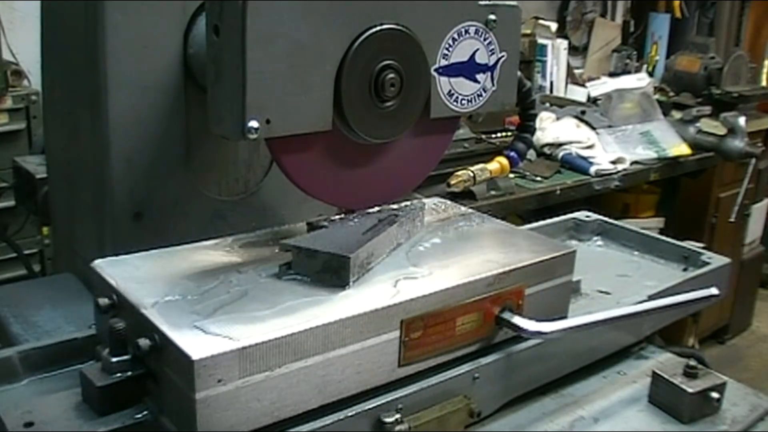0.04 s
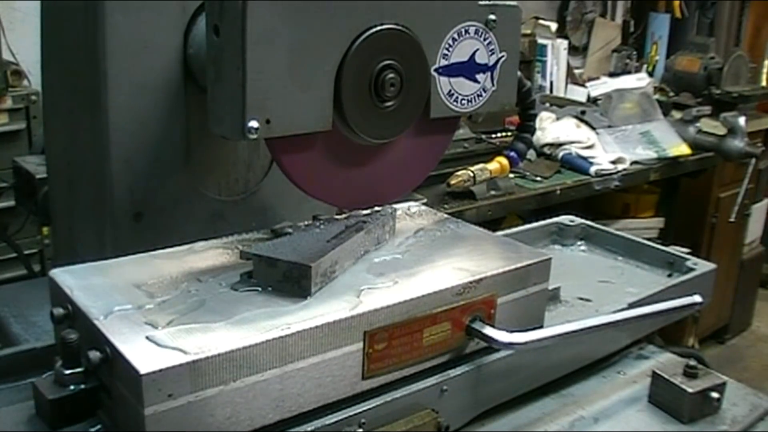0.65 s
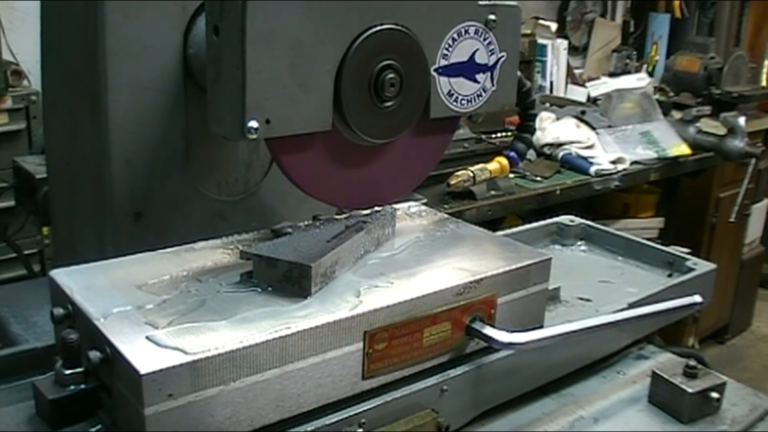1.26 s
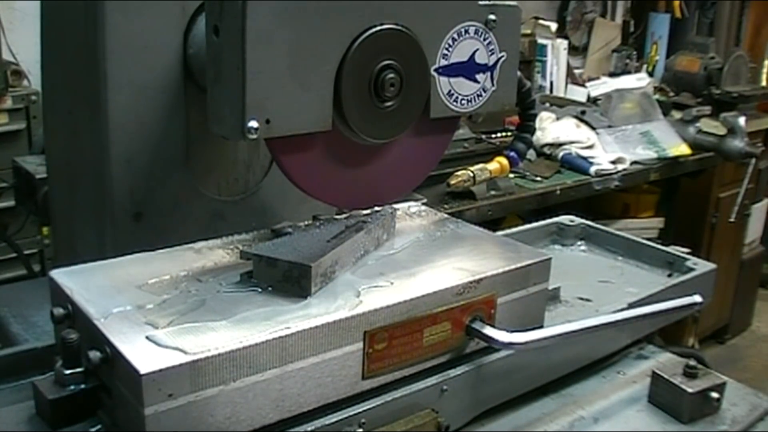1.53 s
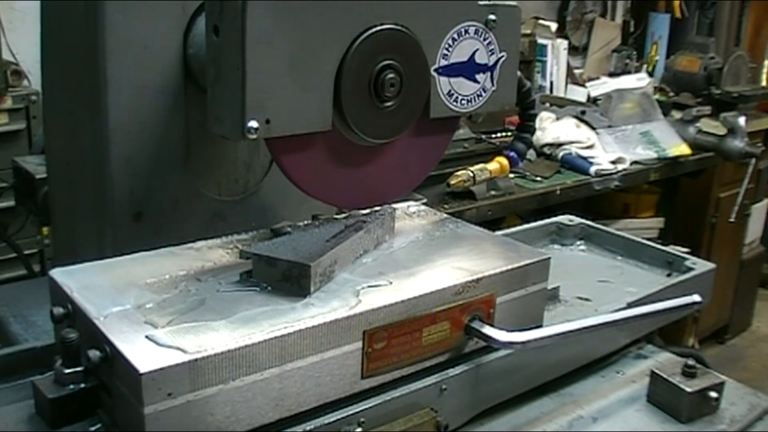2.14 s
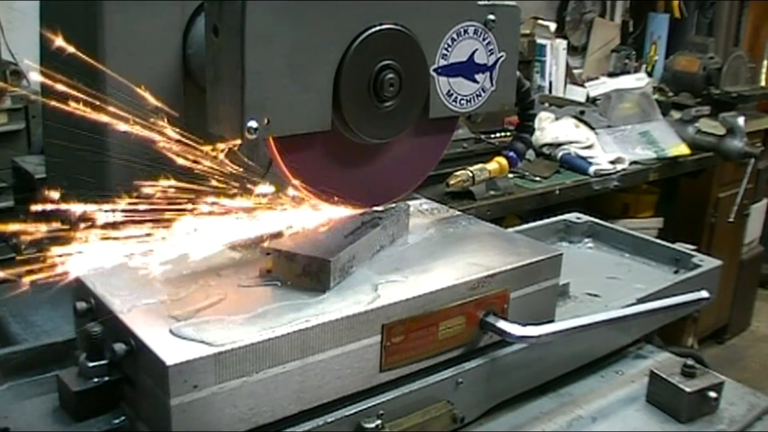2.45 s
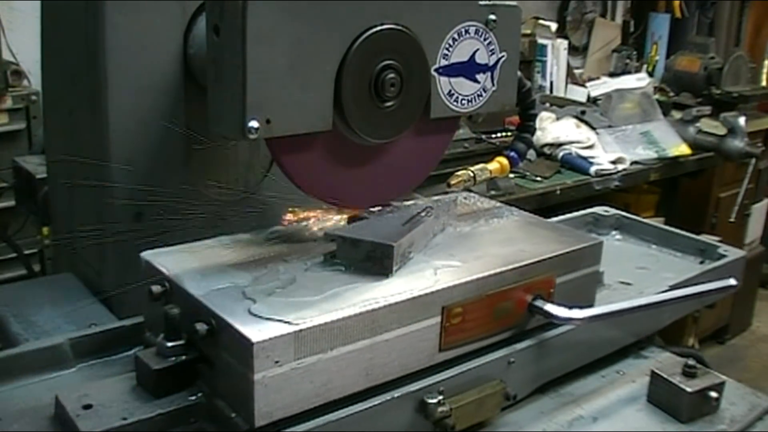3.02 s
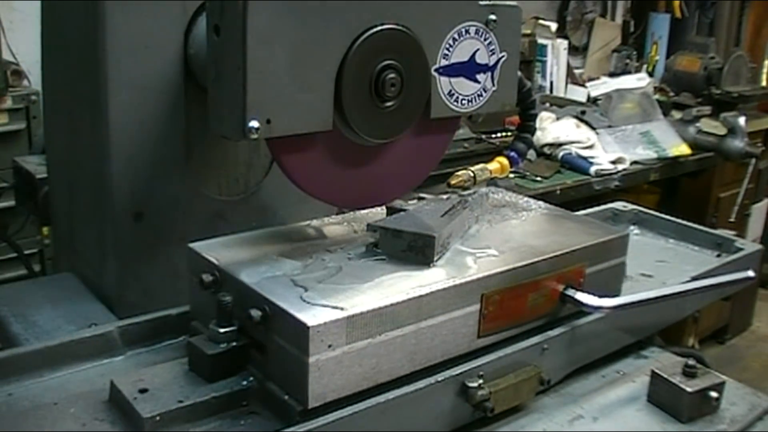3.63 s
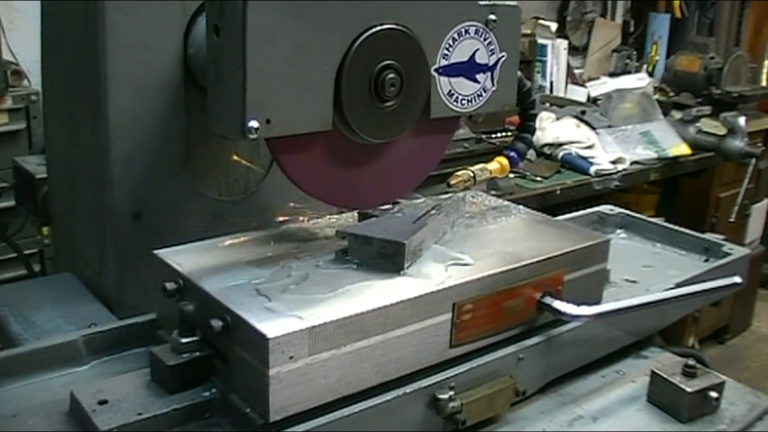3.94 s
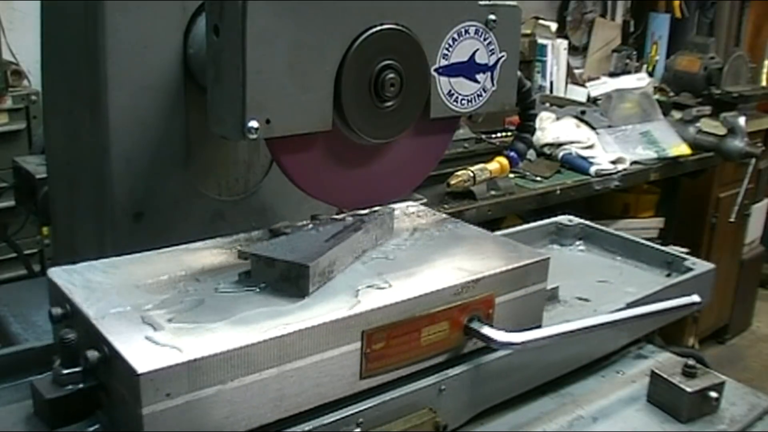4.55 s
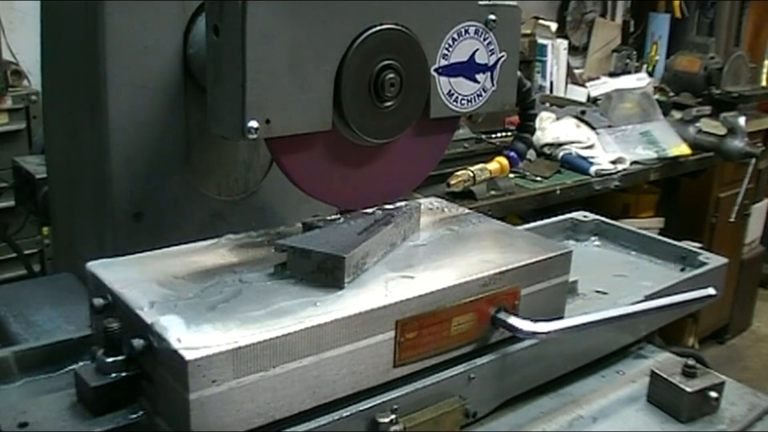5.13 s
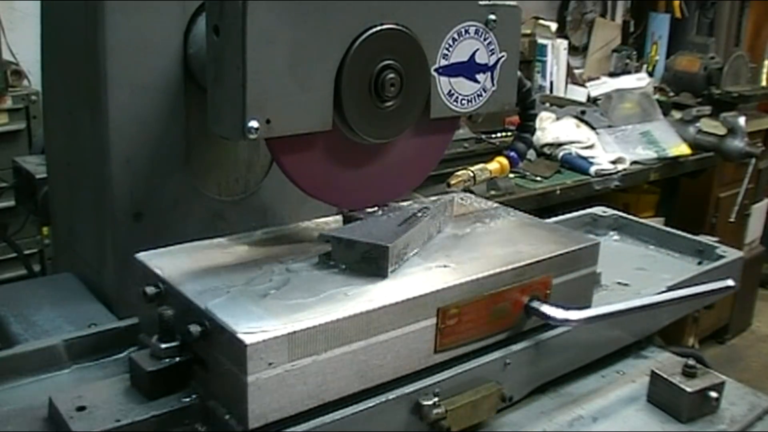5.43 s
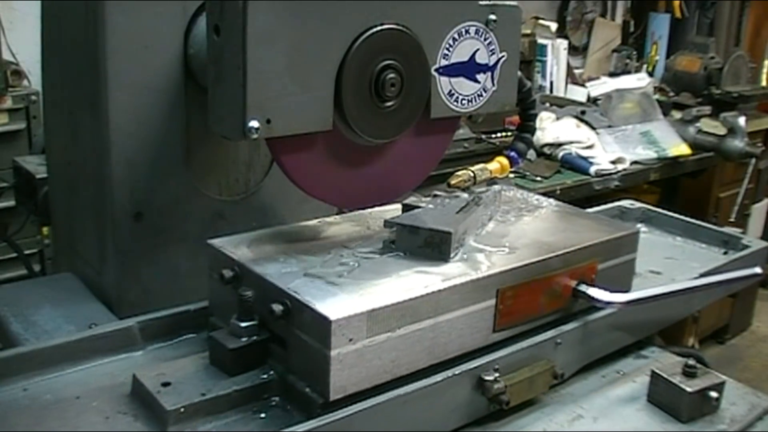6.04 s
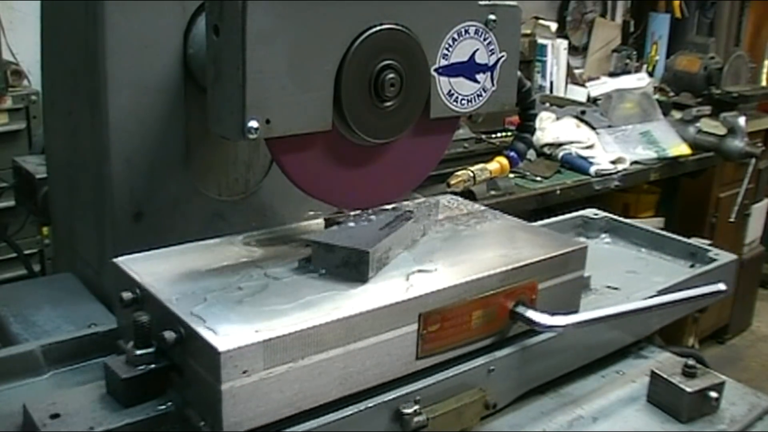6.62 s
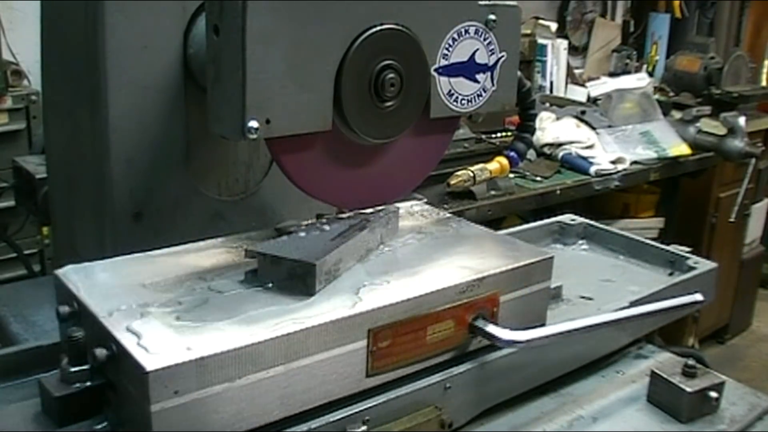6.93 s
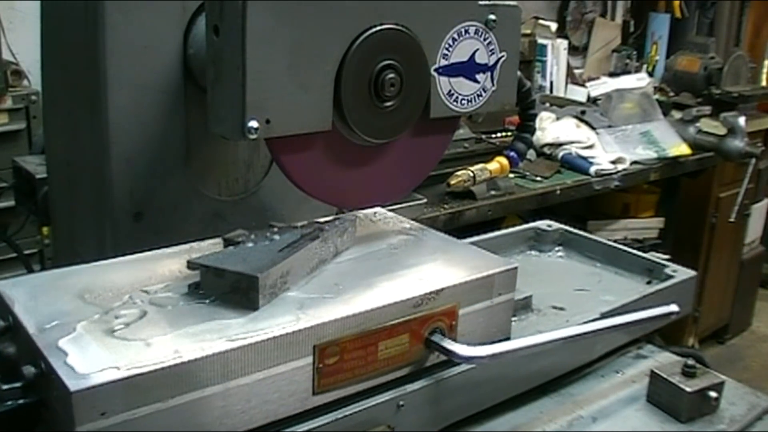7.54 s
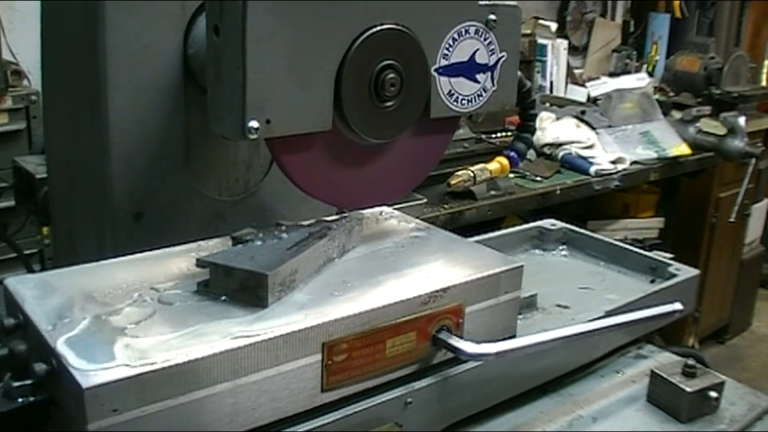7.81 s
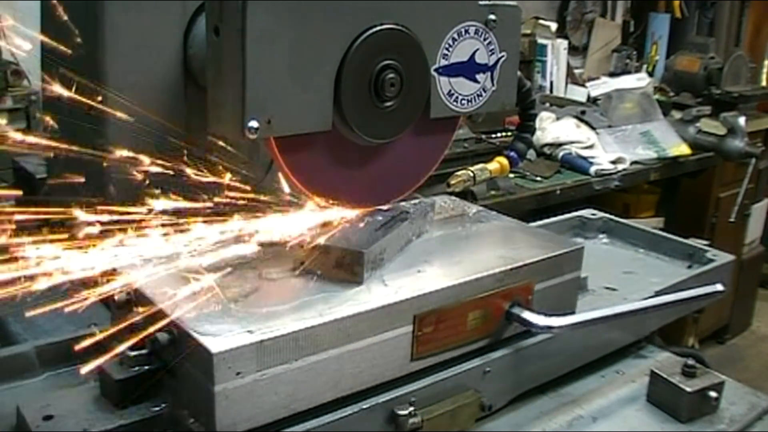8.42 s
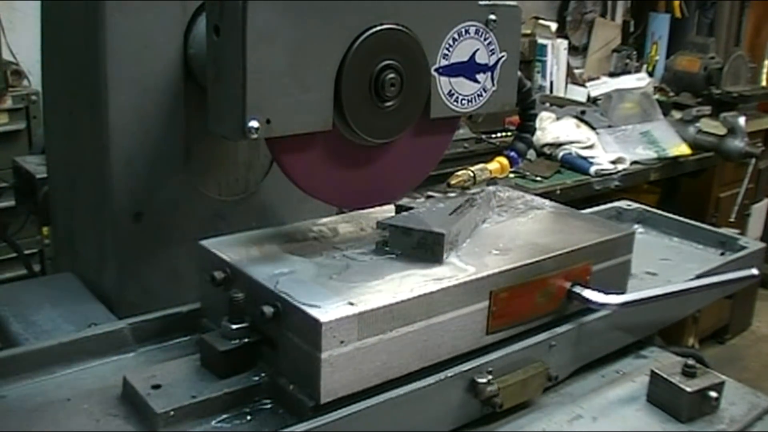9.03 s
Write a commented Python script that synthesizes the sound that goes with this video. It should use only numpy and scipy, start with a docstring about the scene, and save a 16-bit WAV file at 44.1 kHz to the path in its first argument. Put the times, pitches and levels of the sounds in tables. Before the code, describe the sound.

A surface grinder runs in a small workshop, its spindle and motor making a low, rapidly throbbing drone. Over it a jet of air and coolant hisses brightly on steel the whole time. The hiss sputters and surges slightly, shifting between a flat splash and a hollower blowing as the table moves back and forth. A few times the whole sound dips briefly. The stereo microphone is close to the machine.

```python
"""Surface grinder with coolant mist

A small workshop, a stereo microphone close to the machine. The spindle hums and throbs once a turn.
A jet of air and coolant hisses at the steel chuck, which mirrors the hiss into a comb of peaks. As the
table travels, the jet splashes on the flat chuck or blows hollowly across the edge of the bar.
The hiss surges now and then, the drone swells slowly, and a few times the whole sound dips."""
import sys
import numpy as np
from scipy import signal
from scipy.fft import rfft, irfft, next_fast_len
from scipy.io import wavfile
from scipy.ndimage import map_coordinates

SR = 44100
rng = np.random.default_rng(int(sys.argv[2]) if len(sys.argv) > 2 else 0)


def inscribe(sig):
    """Save sig as 16-bit PCM at rate SR to the path in sys.argv[1].

    A 1-D sig is mono; a 2-D sig holds one channel per row.
    Samples are clipped to [-1, 1] before scaling.
    """
    pcm = np.round(np.clip(np.atleast_2d(sig).T, -1, 1) * 32767)
    wavfile.write(sys.argv[1], SR, pcm.astype(np.int16))


N = 408807

# How alike the drone is at the two capsules. Each row: frequency in Hz, likeness from 0 to 1.
LIKENESS = [(100, 0.98), (300, 0.94), (600, 0.64), (1000, 0.13), (2000, 0.091), (5000, 0.1)]
BAR_ONSET, JET_WANDER = 0.054, 0.04  # both as shares of the table's full travel


def amp(db):
    """Decibels to gain."""
    return 10 ** (np.asarray(db) / 20)


def unit(x):
    """Scale to rms 1."""
    return x / np.sqrt(np.mean(x ** 2) + 1e-20)


def along(points, hz):
    """Read (Hz, value) points on a log frequency axis."""
    point_hz, values = np.transpose(points)
    return np.interp(np.log(hz + 1), np.log(point_hz + 1), values)


def bell(x, centre, width):
    """A smooth hump of height 1; width is its half width at 1/e."""
    return np.exp(-((x - centre) / width) ** 2)


def wobble(rate):
    """A smooth random curve, rate knots a second."""
    return map_coordinates(rng.standard_normal(int(N * rate / SR) + 4), [np.arange(N) * rate / SR])


def filtered(x, response):
    """Filter x by a complex response, given as a function of Hz."""
    size = next_fast_len(N + SR // 2)
    return irfft(rfft(x, size) * response(np.fft.rfftfreq(size, 1 / SR)), size)[..., :N]


def rush(colour, channels=3):
    """Unrelated noises of rms 1, coloured by (Hz, dB) points."""
    size = next_fast_len(N)
    hz = np.fft.rfftfreq(size, 1 / SR)
    real, imaginary = rng.standard_normal((2, channels, len(hz)))
    return unit(irfft((real + 1j * imaginary) * amp(along(colour, hz)), size)[:, :N])


def travel():
    """The table's position at every sample, cranked to and fro by hand."""
    # Each row: time in seconds, position from 0 (far left) to 1 (far right).
    path = [(0, 0.51), (.2, 0.56), (.45, .31), (1.1, 0.31), (2.3, 0.29), (2.5, 0.56), (3.05, 0.7),
            (3.55, .92), (3.8, 0.85), (4.1, 0.6), (4.4, 0.48), (4.72, 0.16), (5, 0.37), (5.25, 0.62),
            (5.5, 0.83), (5.75, 0.87), (6, 0.92), (6.25, 0.88), (6.5, 0.61), (7, 0.4), (7.25, 0.1),
            (7.6, 0.036), (7.85, 0.13), (7.97, 0.32), (8.12, .35), (8.25, 0.56), (8.6, 0.71), (8.9, 0.87),
            (9.27, .92)]
    return np.interp(np.arange(N) / SR, *np.transpose(path))


def aim(chuck_at=0.306, left_db_per_travel=24, right_db_per_travel=14.5):
    """How squarely the jet meets the flat chuck: in dB below the best aim, and as a share of the power."""
    offset = travel() - chuck_at
    miss_db = np.maximum(-left_db_per_travel * offset, right_db_per_travel * offset)
    return miss_db, amp(-miss_db) ** 2


def spindle(turn_hz=20.588, skew_rad=1.24, slip_turns=0.00041):
    """The shaft's unbalance knocks every turn; the castings smear it into a throbbing stack of lines."""
    # Each row: multiple of the turn rate (rounded in use), relative mid level in dB, side level in dB.
    strong_lines = [(3, -61, -77), (5, -57, -66), (8, -51, -72), (12, -47, -70), (14, -49.5, -73),
                    (15, -54, -53), (16, -50.5, -51), (17, -46, -64), (18, -45.5, -69), (19, -43.5, -45.5),
                    (20, -37, -54), (21, -52, -64), (22, -66.5, -63), (24, -44, -54), (25, -42.5, -60),
                    (26, -47.5, -48), (27, -47.5, -54), (28, -47.5, -58), (31, -46.5, -62),
                    (32, -43.5, -61), (39, -46.5, -61), (40, -42, -41), (41, -61, -57), (42, -37, -49),
                    (43, -42.5, -53), (44, -48, -53), (46, -50.5, -58), (48, -46, -40), (50, -59, -45),
                    (56, -49.5, -45), (58, -42, -43.5), (59, -42.5, -55), (60, -47, -42), (61, -58.5, -51),
                    (62, -48, -45), (61.4, -51.5, -53), (64, -53.5, -57)]
    # The lines between them. Each row: frequency in Hz, relative level per line in dB.
    weak_lines = [(20, -100), (80, -82), (180, -57), (680, -53), (760, -59), (950, -49.5), (1100, -55.5),
                  (1350, -62), (1480, -70), (1900, -60), (2100, -84)]
    # When each register of the castings answers the knock. Each row: frequency in Hz, lag in turns.
    answer_lag = [(200, .4), (340, .2), (410, .3), (450, .2), (520, .28), (700, .3), (900, .2), (1080, .4),
                  (1130, .9)]
    # How far they smear it. Each row: frequency in Hz, phase scatter in radians.
    smear = [(150, 1.8), (330, 1.3), (430, .8), (520, 1.1), (660, 1.5), (800, 2.1), (1050, 2.2), (1180, .7)]
    size = 4096  # samples in one turn
    orders = np.arange(size // 2 + 1)
    hz = orders * turn_hz
    mid = amp(along(weak_lines, hz)) * (hz < weak_lines[-1][0]) * (orders > 0)
    side = mid * amp(-3) * np.sqrt(1 - along(LIKENESS, hz) ** 2)
    for order, mid_db, side_db in strong_lines:
        mid[round(order)], side[round(order)] = amp(mid_db), amp(side_db)
    lag_cycles = np.cumsum(along(answer_lag, hz))
    scatter_rad = along(smear, hz) * rng.standard_normal(len(orders))
    phase = np.exp(1j * (scatter_rad - 2 * np.pi * lag_cycles))
    # standing waves bring each line to the capsules out of step, louder on the left
    skew = np.exp(1j * (-1) ** orders * skew_rad)
    one_turn = irfft(phase * np.array([mid + side * skew, mid - side * skew]))
    turns = np.arange(N) / SR * turn_hz + slip_turns * wobble(12)
    throb = np.array([np.interp(turns, np.arange(size) / size, wave, period=1) for wave in one_turn])
    shake_db = .5 * wobble(28)
    return unit(throb * amp(shake_db))


def whining(throb, above_hz=750):
    """Twice the spindle's upper lines swell into a whine."""
    # Each row: peak time in seconds, half length in seconds, rise in dB.
    whines = [(.78, .27, 1.3), (4.92, .2, 1.6)]
    t = np.arange(N) / SR
    rise_db = sum(db * bell(t, at, length) for at, length, db in whines)
    return throb + (amp(rise_db) - 1) * filtered(throb, lambda hz: hz > above_hz)


def frame():
    """Bearings and the wheel's wind rumble through the machine's castings."""
    # Each row: frequency in Hz, relative noise density in dB.
    rumble_colour = [(20, -33), (55, -28), (85, -7.5), (115, 3.5), (140, -5), (200, 2.5), (400, 0.2),
                     (505, 3.5), (580, -3), (780, -0.5), (862, 4), (930, -1), (1130, 0.2), (1200, 2.5),
                     (1280, 2), (1400, -0.5), (2600, -7), (6000, -20.5)]
    spread = lambda hz: np.arccos(along(LIKENESS, hz)) / 2
    rumble = rush(rumble_colour, channels=2)
    mid, side = filtered(rumble, lambda hz: np.array([np.cos(spread(hz)), np.sin(spread(hz))]))
    return unit(np.array([mid + side, mid - side]))


def motor(hum_hz=118):
    """The motor's wavering electric hum."""
    waver_db = 1.8 * wobble(14)
    return unit(np.sin(2 * np.pi * hum_hz * np.arange(N) / SR) * amp(waver_db))


def drone(reflected_db=0.82, growth_db_per_s=0.04):
    """Spindle, frame and motor swell together, a little louder when the chuck reflects them."""
    # Each row: peak time in seconds, half length in seconds, rise in dB.
    swells = [(.74, 0.54, 1.7), (1.464, 0.24, 1.4), (2.2, 0.16, 2), (3.02, 0.23, 1.5), (4.92, 0.15, 1),
              (8.145, 0.058, 1)]
    t = np.arange(N) / SR
    _, on_chuck = aim()
    swell_db = sum(db * bell(t, at, length) for at, length, db in swells) + .25 * wobble(8.6)
    level_db = -29.5 + reflected_db * on_chuck + growth_db_per_s * (t - t.mean()) + swell_db
    lean_left = amp([[.6], [-.6]])
    body = whining(spindle()) + amp(-4) * frame() * lean_left + amp(-24.5) * motor()
    return amp(level_db) * body


def jet(bar_at=0.72, bar_shadow_db=5, edge_at=0.9, spray_caught_db=5, spray_fade_db_per_s=0.02):
    """Air and droplets hiss and sputter on whatever lies under the nozzle: three unrelated copies."""
    # The jet's five noises. Each row: frequency in Hz, relative noise density in dB.
    nozzle_colour = [(1500, -31), (3300, -15.5), (4500, -11.5), (6000, -11), (7500, -7.5), (8500, -3),
                     (9700, 2.5), (10900, 3.5), (12000, -10), (13300, -4), (15300, -17)]
    spray_colour = [(8000, -33.5), (10500, -9), (11700, 4.5), (12600, 5), (13300, -1.5), (13800, 0),
                    (14300, -4), (15000, -6), (15350, -18)]
    splash_colour = [(1800, -31), (2750, -16.5), (3250, -4), (3900, -9), (4450, -7.5), (4900, -9.5),
                     (5400, -3), (5950, -3.5), (6600, -1), (7600, 1), (8700, 4.5), (9800, 4), (11000, -24),
                     (15300, -28)]
    edge_colour = [(1000, -15), (1700, -4), (2450, 4), (2900, 1.5), (3500, 6), (4400, -6), (5300, -3),
                   (7000, -33)]
    whistle_colour = [(3600, -36), (4200, -16), (5400, -18), (6000, -36), (11800, -22), (12500, 1),
                      (12800, 5), (13200, -7), (13800, -5), (14200, -25)]
    # Surges of the hiss and rasps of the edge noise. Each row: peak time in seconds, rise in dB.
    surges = [(.7, 1), (2.66, 1.5), (3.18, 1.7), (3.51, 0.8), (3.83, 2), (4.18, 2), (5.08, 1.5),
              (5.52, 0.5), (5.69, 1.5), (6.64, 2), (7.14, 1.5), (7.46, 1.5), (7.79, 0.5), (8.21, 1.7),
              (8.9, 1.5)]
    rasps = [(.51, 6.5), (3.53, 2), (5.72, 1.5), (6.15, 0.5), (8.91, 3.3)]
    t = np.arange(N) / SR
    position = travel()
    miss_db, on_chuck = aim()
    sputter_db = 0.35 * wobble(35)
    flow_db = sputter_db + 0.27 * wobble(11) + sum(db * bell(t, at, 0.054) for at, db in surges)
    nozzle = amp(-24 + flow_db) * rush(nozzle_colour)
    # the chuck catches the fine spray
    spray_loss_db = spray_caught_db * on_chuck + spray_fade_db_per_s * (t - t.mean())
    spray = amp(-23.5 + flow_db - spray_loss_db) * rush(spray_colour)
    # a broad splash on the flat chuck, blocked in part when the bar cuts in
    on_bar = .5 + .5 * np.tanh((position - bar_at) / BAR_ONSET)
    splatter_db = sputter_db + 0.65 * wobble(18)
    splash = amp(-24.5 - miss_db - bar_shadow_db * on_bar + splatter_db) * rush(splash_colour)
    # a hollow blowing that grows as the bar's edge comes near
    near_db = 3 * (position - .5) + 6 * bell(position, edge_at, 0.067)
    rasp_db = sum(db * bell(t, at, 0.077) for at, db in rasps)
    edge = amp(-43 + near_db + rasp_db) * rush(edge_colour)
    # an airy whistle at the far left of the travel
    whistle = amp(-26.5 + flow_db) * bell(position, 0, 0.16) * rush(whistle_colour)
    return nozzle + spray + splash + edge + whistle


def near_echoes(direct, patterns=7, first_echo_s=0.0014, t60_s=0.045):
    """Short echoes off the machine's near faces; their resonances shift as the table travels."""
    t = np.arange(SR // 25) / SR
    tails = rng.standard_normal((patterns, 2, len(t))) * amp(-60 * t / t60_s) * (t > first_echo_s)
    tails /= np.linalg.norm(tails, axis=2, keepdims=True)
    steady = np.pad(direct, (len(t), 0), mode="reflect")  # the room is already full of sound
    echoes = signal.oaconvolve(steady[None, None], tails, axes=2)[..., len(t):len(t) + N]
    # one pattern for each stretch of the travel; the wandering jet blurs the place
    place = np.clip(travel() + JET_WANDER * wobble(6), 0, 1) * (patterns - 1)
    shares = np.clip(1 - abs(place - np.arange(patterns)[:, None]), 0, 1)
    return np.einsum("kn,kcn->cn", np.sqrt(shares), echoes)


def workshop(direct, far_pair):
    """The machine scatters the hiss from close by; the room returns an unrelated copy to each capsule."""
    # Each row: frequency in Hz, the near faces' share of the scattered power from 0 to 1.
    near_share = [(2000, 0.45), (3300, .7), (5500, 0.95), (8000, .5), (12000, .6)]
    # Each row: frequency in Hz, scattered level in dB against the direct hiss.
    scatter_level = [(2000, 1.5), (3300, -5), (4500, -3), (5800, -6), (7000, -3.5), (9000, -5), (10800, -4),
                     (12000, -2), (14600, 0)]
    near = filtered(near_echoes(direct), lambda hz: np.sqrt(along(near_share, hz)))
    far = filtered(far_pair, lambda hz: np.sqrt(1 - along(near_share, hz)))
    return filtered(near + far, lambda hz: amp(along(scatter_level, hz)))


def chuck_bounce(direct, stretch_per_travel=0.023):
    """The echo off the chuck: with the direct hiss, a comb whose peaks sink as the table moves right."""
    # Each row: frequency in Hz, left and right peak spacing in Hz with the table at far left.
    comb = [(3300, 1110, 1064), (6500, 1085, 1100), (8700, 1099, 1072), (10800, 1088, 1050),
            (12800, 1080, 1076), (15000, 970, 1200)]
    # Each row: frequency in Hz, left and right echo level in dB against the direct hiss.
    strength = [(1800, -32, -32), (2700, -12, -13), (3700, -18, -20), (4870, -8, -12), (5670, -19, -11),
                (6600, -11, -18), (8000, -6, -7.5), (10000, -6, -13), (12200, -4, -14), (15000, -5, -14)]
    comb_hz, *spacings_hz = np.transpose(comb)
    band_hz, *levels_db = np.transpose(strength)
    drift_samples = SR / np.mean(spacings_hz) * stretch_per_travel * (travel() + JET_WANDER * wobble(10))
    bounce = map_coordinates(direct, [np.arange(N) - drift_samples], order=3)
    delay_s = lambda hz: 1 / np.array([np.interp(hz, comb_hz, spacing) for spacing in spacings_hz])
    gain = lambda hz: amp([np.interp(hz, band_hz, db) for db in levels_db])
    return filtered(bounce, lambda hz: gain(hz) * np.exp(-2j * np.pi * hz * delay_s(hz)))


def bar_notches(hiss):
    """As the bar slides under the jet, its echo cancels narrow bands of the hiss."""
    # Each row: centre in Hz, half width in Hz, full depth in dB, table position where it sets in.
    notches = [(4200, 100, 8, 0.83), (4720, 100, 9, 0.46), (5550, 140, 11, 0.7)]
    centre_hz, width_hz, depth_db, start = np.transpose(notches)[:, :, None, None]
    engaged = .5 + .5 * np.tanh((travel() - start) / BAR_ONSET)
    cancelled = filtered(hiss, lambda hz: (1 - amp(-depth_db)) * bell(hz, centre_hz, width_hz))
    return hiss - np.sum(engaged * cancelled, axis=0)


def at_capsules(hiss):
    """The hiss leans mostly left, and some bands reach the capsules more out of step than others."""
    # Each row: frequency in Hz, gain of the side signal in dB.
    width = [(2900, 1), (3300, -5), (3800, 2.5), (5000, 1.5), (6050, -6), (6600, 2.5), (8800, 0.5),
             (9400, 4), (10000, -2), (10500, -10), (11100, 12.5), (11600, -3), (12100, 0.5), (12700, -8),
             (13300, 4), (13850, 2), (14450, 8), (15000, 0)]
    # Each row: frequency in Hz, left minus right in dB.
    lean = [(2000, 4.5), (3500, -0.5), (6000, 1), (7500, -0.5), (8700, 2), (11000, 0), (13000, 1),
            (15000, -2)]
    mid = (hiss[0] + hiss[1]) / 2
    side = filtered((hiss[0] - hiss[1]) / 2, lambda hz: amp(along(width, hz)))
    balance = lambda hz: amp(along(lean, hz) * np.array([[.5], [-.5]]))
    return filtered(np.array([mid + side, mid - side]), balance)


def mist():
    """The coolant jet reaches the microphone directly, off the chuck and by way of the workshop."""
    direct, *far_pair = jet()
    scattered = workshop(direct, np.array(far_pair))
    hiss = direct + chuck_bounce(direct) + scattered
    return at_capsules(bar_notches(hiss))


def dip_gain():
    """Now and then the whole sound drops briefly and swells back."""
    # Each row: lowest point in seconds, depth in dB, fall and recovery time constants in seconds.
    dips = [(1.22, 1.3, .1, 0.12), (3.96, 3, 0.061, 0.092), (5.197, 3, 0.0018, 0.097),
            (7.56, 1.5, .04, 0.087), (8.03, 0.5, .05, .06)]
    t = np.arange(N) / SR
    drop_db = sum(db * np.exp(-np.maximum((at - t) / fall, (t - at) / recovery))
                  for at, db, fall, recovery in dips)
    return amp(-drop_db)


def scene():
    """The running grinder and its coolant jet, from close by."""
    return (drone() + mist()) * dip_gain()


def record(dry):
    """The camera's microphone keeps nothing above its band limit."""
    top_hz = 15380
    return filtered(dry, lambda hz: hz < top_hz)


dry = scene()
out = record(dry)
inscribe(out)
```